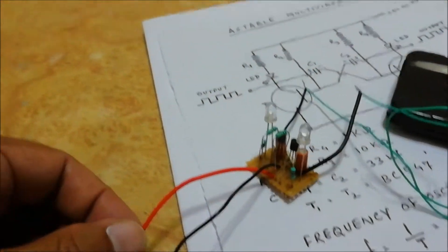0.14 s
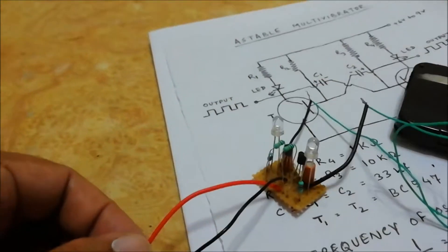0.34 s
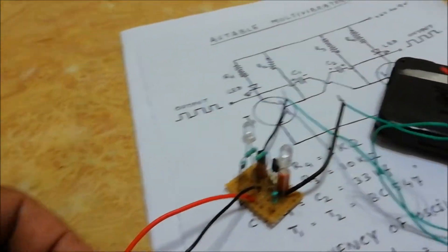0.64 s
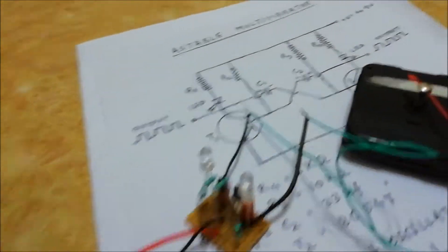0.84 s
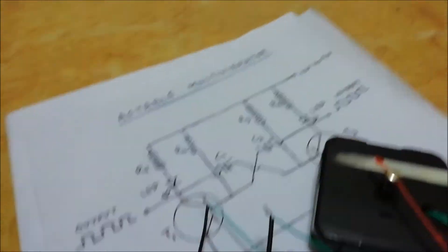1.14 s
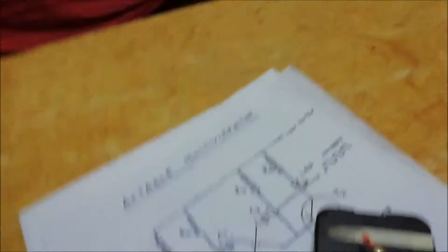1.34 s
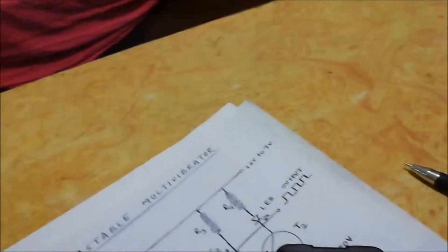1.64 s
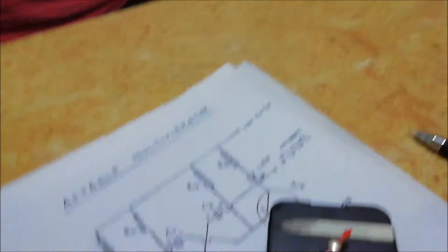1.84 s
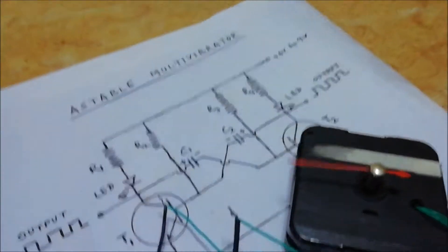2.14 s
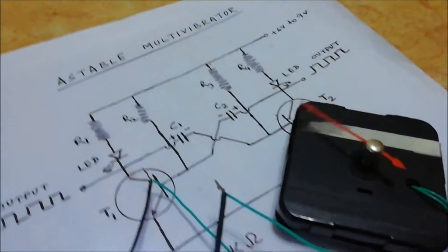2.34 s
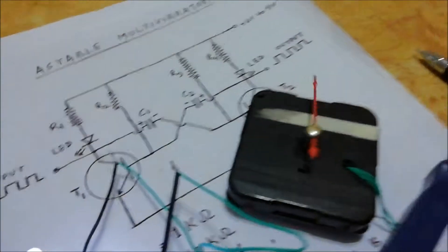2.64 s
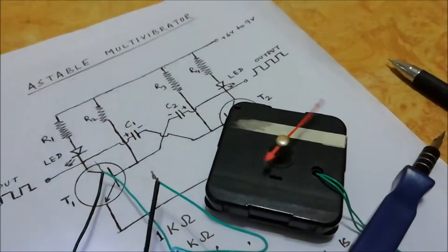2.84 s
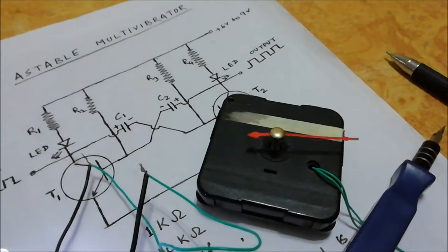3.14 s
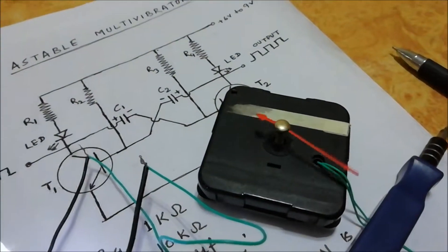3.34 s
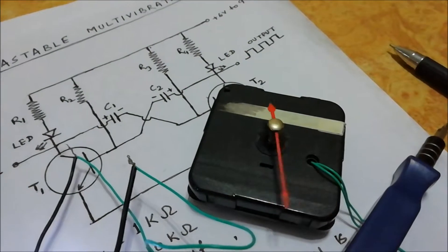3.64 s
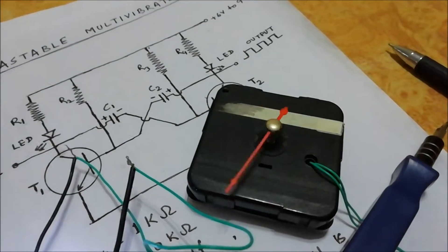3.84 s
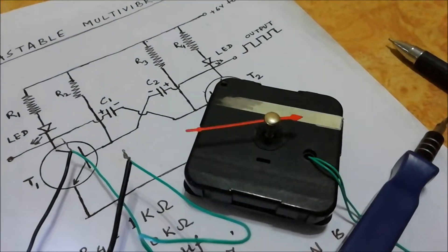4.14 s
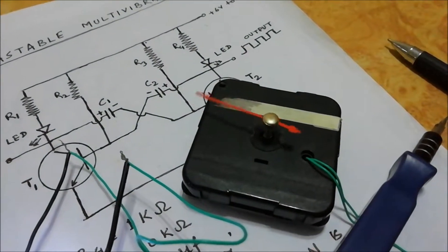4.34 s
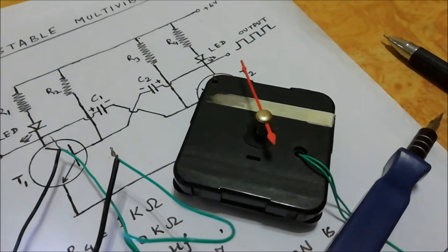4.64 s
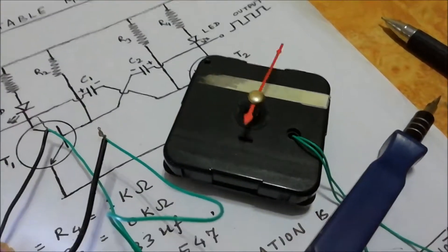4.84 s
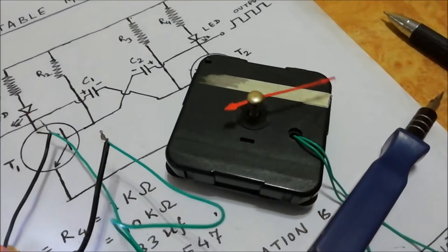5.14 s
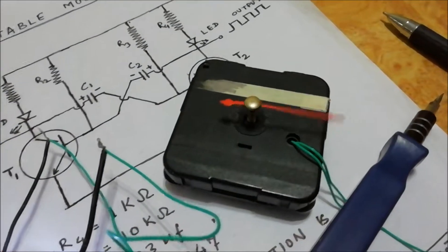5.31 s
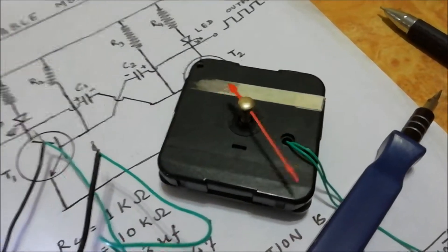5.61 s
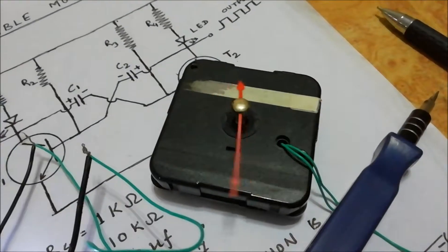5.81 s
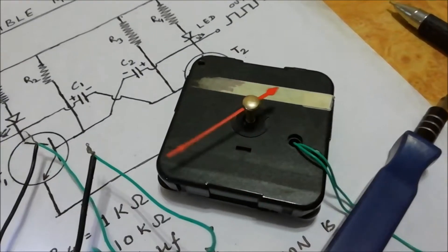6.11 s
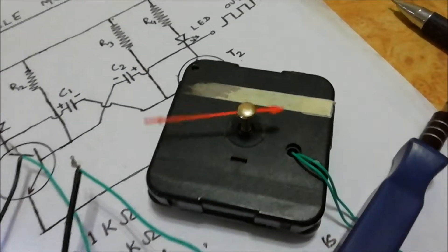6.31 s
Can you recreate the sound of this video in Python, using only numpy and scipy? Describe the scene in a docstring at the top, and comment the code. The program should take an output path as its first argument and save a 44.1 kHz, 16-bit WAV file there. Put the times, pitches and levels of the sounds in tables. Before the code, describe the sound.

Quiet indoor hum and low hiss run throughout. At about 0.2 s a short hollow scuff sounds across the room, mostly echo, dying within half a second. Low grip rumble comes and goes, with a soft bump near 0.9 s. From 1.3 to 1.6 s a tiny clock movement emerges as the phone moves closer: dull plastic gear chatter, about ten pulses per second, over a resonant desk drone. It speeds up over the next second to roughly fourteen pulses per second and becomes brighter, with crisp ticks and irregular sharp knocks, notably at 2.5 and 2.8 s. Deep handling thumps cluster at 2.3-2.7 s, the strongest near 2.66 s. Afterwards the rattling whir continues close and dry, its rate drifting slightly, its brightness varying. Softer low bumps fall near 4.2, 4.9, 5.2 and 6.45 s. The motor is still running when it ends around 6.5 s.

```python
"""Steady room hum and hiss, filtered noise, open the scene; a brief echoing scuff follows, noise in decaying bands.
Fingers bump a hand-held phone with two unlike ports: pressure pulses over a low rumble that lasts throughout.
As the phone moves closer, a desk drones (resonant noise) under a small clock movement driven far too fast.
Its rotor spins up and then hunts about a steady rate; plastic gears rattle once a turn, as impulses ringing
the decaying modes of desk top and plastic case."""
import sys
import numpy as np
from scipy import signal
from scipy.fft import rfft, irfft, next_fast_len
from scipy.io import wavfile
from scipy.ndimage import uniform_filter1d

SR = 44100
rng = np.random.default_rng(int(sys.argv[2]) if len(sys.argv) > 2 else 0)


def int16_out(signal):
    """Quantize to a 16-bit WAV file."""
    q = np.round(np.clip(np.atleast_2d(signal).T, -1, 1) * 32767)
    wavfile.write(sys.argv[1], SR, q.astype(np.int16))


def voltage_ratio(level):
    """Linear amplitude factor for a level in decibels (scalar or array-like)."""
    return 10 ** (np.asarray(level, float) / 20)


N = 285395
T = np.arange(N) / SR

# basic gear chatter in the low modes as the phone moves: (time [s], level [dB])
CHATTER_LOW = [(1.3, -102), (1.46, -79), (1.535, -68), (1.62, -62.5), (2.1, -62), (3.0, -63.5),
               (3.15, -69.5), (3.4, -68), (5.8, -65.5), (6.15, -69.5), (6.47, -63.5)]
# top modes of the chatter against the low ones: (time [s], level [dB])
CHATTER_TOP = [(1.55, -19), (2.4, -11), (3.0, -10), (3.25, -12), (3.5, -7), (3.95, -11.5), (4.75, -6.5),
               (5.15, -11), (5.5, -7), (6.47, -10)]
# hardest slaps of teeth through their backlash: (time [s], top-mode level [dB], low-mode level [dB])
KNOCKS = [(1.585, -53, -50), (1.594, -55, -44), (1.668, -55.5, -47), (1.688, -47.5, -46.5),
          (1.777, -65, -43.5), (1.868, -51.5, -51.5), (1.884, -53.5, -50.5), (1.954, -41.5, -47),
          (1.977, -51, -50), (2.052, -55, -44.5), (2.061, -53.5, -42.5), (2.069, -52, -46),
          (2.147, -53.5, -51), (2.157, -55, -51.5), (2.223, -53.5, -52.5), (2.237, -46.5, -48),
          (2.287, -48.5, -57), (2.396, -47, -45), (2.465, -44, -47), (2.505, -36, -45), (2.568, -46, -47.5),
          (2.732, -41.5, -51.5), (2.756, -47, -52), (2.827, -40, -48), (2.834, -29.5, -39.5),
          (2.896, -43.5, -43), (2.969, -43, -45.5), (2.975, -35.5, -47), (3.038, -48, -64),
          (3.112, -46, -51), (3.387, -48, -53), (3.459, -46.5, -62), (3.529, -43, -51), (3.641, -46, -57),
          (3.811, -47, -51), (3.876, -45, -54), (4.09, -45.5, -55), (4.149, -43.5, -53),
          (4.239, -51.5, -50.5), (4.346, -51, -50), (4.413, -46, -54), (4.515, -48, -55),
          (4.657, -39.5, -55), (4.701, -42.5, -55), (4.731, -46, -52), (4.874, -42.5, -58),
          (5.016, -47.5, -52), (5.309, -49, -69), (5.318, -46, -66), (5.377, -44.5, -62), (5.532, -46, -53),
          (5.634, -45, -55), (5.732, -44.5, -55), (5.881, -38.5, -45), (5.995, -49, -53.5),
          (6.022, -48.5, -55), (6.422, -53, -54)]
# modes rung by the gears, at each port: the lowest two of the desk top, the rest of the plastic case:
# (frequency [Hz], t60 [ms], left level [dB], right level [dB])
RUNG_MODES = [(1250, 20, -23, -18.5), (1866, 12.4, -20.5, -13), (2256, 21.2, -14.5, -7.5),
              (2500, 16.7, -10, -8.5), (2824, 8.8, -5, -12), (3290, 4.8, -3, -18), (4240, 7.1, -62, -8),
              (4980, 5, -1.5, -22), (5740, 6.1, -9.5, -10), (6360, 8.6, -6, -29), (6970, 8.2, -12, -51),
              (8540, 4.74, -55, -4.5), (9380, 5, -53, -12), (11400, 2.8, -36, -31)]
# delay of the right port as the phone turns: (time [s], delay [ms])
PORT_LAG = [(1.58, 0.092), (3.0, 0.18)]
# resonances of the desk top, relative levels: (frequency [Hz], width [Hz], level [dB])
DESK_MODES = [(1152, 330, 6.5), (1847, 310, 7.5)]
# fingers bumping the phone: (time [s], peak level [dB], nominal push length [ms])
THUMPS = [(0.892, -34, 4.7), (1.513, -36, 6.6), (2.325, -28.5, 5.7), (2.503, -28, 5.1), (2.543, -27.5, 3.7),
          (2.653, -22, 3.9), (2.663, -16, 2.66), (2.681, -20, 3.6), (4.213, -25.5, 5.6),
          (4.353, -33.5, 7.5), (4.912, -38.5, 5.7), (5.24, -35, 6.73), (6.453, -36, 4.58)]
# rumble from an unsteady grip: (time [s], level [dB])
GRIP = [(0, -63.5), (.43, -51.5), (.5, -61.5), (.88, -47), (1.1, -61), (1.49, -47), (1.95, -60),
        (2.08, -48.5), (2.2, -66), (2.33, -42), (2.68, -35.5), (2.76, -56), (2.86, -45), (2.93, -65),
        (3.3, -66.5), (3.42, -50.5), (3.72, -67), (4.17, -42.5), (4.36, -43.5), (4.55, -64), (4.84, -70),
        (4.91, -45.5), (5.05, -64.5), (5.27, -49.5), (5.8, -64), (6.47, -48)]
# bands of the scuff, relative levels: (frequency [Hz], width [Hz], level [dB])
SCUFF_BANDS = [(677, 190, 7), (880, 110, 14.5), (1410, 800, 1), (6200, 2500, -13.5)]
# spectrum shape of the room sound common to both ports: (frequency [Hz], relative density [dB per Hz])
ROOM_MID = [(140, -9.5), (216, 1), (391, -9), (476, -18.5), (750, -15), (932, -24.5), (1090, -18),
            (1500, -14.5), (1730, -18.5), (1890, -14.5), (2020, -25), (2200, -26.5), (3940, -35),
            (6600, -35.5), (7560, -40.5), (14800, -38.5)]
# spectrum shape of the room sound opposed in the ports: (frequency [Hz], relative density [dB per Hz])
ROOM_SIDE = [(60, -23), (145, -4.5), (661, 2), (1300, -6), (1890, -7.5), (3620, -19), (6180, -19),
             (7630, -26), (14600, -23)]
# room sound, left minus right: (frequency [Hz], level difference [dB])
PORT_BALANCE = [(400, 0), (700, -4.5), (1300, -0.5), (2200, -6), (4000, 0.5)]

# rotor: turn zero falls at FIRST_S, while the speed is still short of full
FIRST_S, FULL_TURNS_PER_S, SHORT_TURNS_PER_S, SPIN_UP_S = 1.585, 14.447, 4.81, 0.843
HUNT_TURNS, HUNT_PERIOD_S, HUNT_FROM_S = 0.38, 4.22, 3.054


def movement(mode_scatter=0.98, port_scatter=0.45):
    """Modal excitation: each contact lands elsewhere on the teeth and rings every mode differently."""
    when, db = teeth()
    lag_s = np.interp(when, *np.transpose(PORT_LAG)) / 1000
    common = rng.choice([-1, 1], len(when))
    out = np.zeros((2, N))
    for hz, t60_ms, left_db, right_db in RUNG_MODES:
        register = np.searchsorted([3700, 7500], hz)  # low, middle or top modes
        size = voltage_ratio(db[register])
        own, left, right = rng.standard_normal((3, len(when)))
        blow = common + mode_scatter * own
        unlike = port_scatter * hz / 2400  # short waves reach the two ports by different paths
        left_hits = taps(when, size * (blow + unlike * left))
        right_hits = taps(when + lag_s, size * (blow + unlike * right))
        ringing = ring(np.array([left_hits, right_hits]), hz, t60_ms / 1000)
        out += voltage_ratio([[left_db], [right_db]]) * ringing
    return out


def teeth():
    """Impact with backlash: times and (low, middle, top) levels of dense chatter and bouncing knocks."""
    when, chatter = chatter_contacts()
    at, knocks = knock_contacts()
    return np.r_[when, at], np.c_[chatter, knocks]


def chatter_contacts(count=6000, scatter_db=2.5, most_db=21.0, surge_db=2.5):
    """Random impacts at uniform times, lifted by each jerk of the rotor and bounded by the backlash."""
    start = CHATTER_LOW[0][0]
    when = start + (T[-1] - start) * rng.random(count)
    size_db = scatter_db * rng.exponential(size=count)
    shared = walk(60)
    chatter = []
    # the jerks show most in the upper modes
    for base_db, share in zip(gears_db(when), [0.65, 1.05, 1.2]):
        surge = np.interp(when, T, surge_db * (shared + walk(40)))
        lift_db = size_db + share * beat(when) + surge
        chatter.append(base_db + most_db * np.tanh(lift_db / most_db))
    return when, np.array(chatter)


def knock_contacts(bounces=12, middle_db=-4.5):
    """Repeated impact: each knock or tick is a cluster of bounces that fade soonest in the treble."""
    at, top_db, low_db = np.repeat(np.r_[KNOCKS, ticks()], bounces, axis=0).T
    dull_db = np.clip(low_db - top_db, 0, 25)
    drag = 1 + 0.1 * dull_db  # dull knocks swell in and drag on, bright ones start sharply
    after_ms = 4.5 * drag * rng.random(len(at)) - 0.3 * dull_db
    fade_db = -np.outer([0.8, 2.1, 2.6], np.abs(after_ms) / drag)
    start_db = np.array([low_db, (low_db + top_db) / 2 + middle_db, top_db])
    return at + (after_ms - 1.2) / 1000, start_db + fade_db


def ticks(count=6, first=0.42, apart=0.135, slip=0.035,
          low_over_db=3.0, top_over_db=12.0, spread_db=4.0, share=0.46):
    """Periodic tooth contact: trains of crisp ticks of chance strength, with a rest after each main jerk."""
    # first, apart and slip are in turns
    whole_turns = np.arange(int(turns(T[-1])))[:, None]
    turn = (whole_turns + first + apart * np.arange(count)).ravel()
    off, top, low = rng.standard_normal((len(turn), 3)).T
    at = np.interp(turn + slip * off, turns(T), T)
    low_db, _, top_db = gears_db(at) + share * beat(at)
    top_db = top_db + top_over_db + spread_db * top
    low_db = low_db + low_over_db + spread_db * low / 2
    free = np.abs(at[:, None] - np.array(KNOCKS)[:, 0]).min(axis=1) > 0.006  # clear of the knocks
    return np.c_[at, top_db, low_db][free]


def gears_db(s, middle_db=-9, middle_db_per_turn_s=0.5):
    """Speed-dependent excitation: basic chatter in three registers, the middle stronger below full speed."""
    low = np.interp(s, *np.transpose(CHATTER_LOW))
    middle = low + middle_db + middle_db_per_turn_s * shortfall(s)
    top = low + np.interp(s, *np.transpose(CHATTER_TOP))
    return np.array([low, middle, top])


def beat(s, main_db=11, second_db=4.0, second_at=0.66, width=0.22, quick=0.56):
    """Cyclic modulation: the rotor winds up to a hard jerk once a turn, then jerks less hard later in it."""
    def jerk(at):
        u = (turns(s) - at + 0.5) % 1 - 0.5  # turns from the jerk
        return np.exp(-0.5 * (u / width / np.where(u > 0, quick, 1)) ** 2)  # quicker to fall quiet
    return main_db * jerk(0.063) + second_db * jerk(second_at)


def turns(s):
    """Integrated speed: rotor turns since FIRST_S, with an exponential spin-up and a slow sinusoidal hunt."""
    def hunt(t):
        return HUNT_TURNS * np.sin(2 * np.pi * (t - HUNT_FROM_S) / HUNT_PERIOD_S)
    lost = SPIN_UP_S * (SHORT_TURNS_PER_S - shortfall(s))
    return FULL_TURNS_PER_S * (s - FIRST_S) - lost + hunt(s) - hunt(FIRST_S)


def shortfall(s):
    """Exponential approach: turns a second still missing from full speed, hunting aside."""
    return SHORT_TURNS_PER_S * np.exp(-(s - FIRST_S) / SPIN_UP_S)


def desk(db=-64.5, start_s=1.17, rise_s=0.22, share=0.4, slow_db=9.5):
    """Forced resonance: the desk top drones, its lowest mode strongest while the rotor is still slow."""
    slowness = np.clip(shortfall(T) / SHORT_TURNS_PER_S, 0, 1.3)
    noise = rng.standard_normal(N)
    lowest = bands(noise, DESK_MODES[:1]) * voltage_ratio(slow_db * slowness)
    drone = lowest + bands(noise, DESK_MODES[1:])
    rise = 1 - np.exp(-np.clip(T - start_s, 0, None) / rise_s)
    return level(drone, db) * rise ** 2 * voltage_ratio(share * beat(T) + walk(30))  # db holds before this shaping


def handling():
    """Structure-borne sound: short pushes on the phone case over a low grip rumble."""
    return thumps() + grip_rumble()


def thumps(rebound=2.3, lead=0.15, lag_ms=0.85):
    """Push and rebound: a narrow pulse less a broad one, so a dip frames each push, deeper before it."""
    out = np.zeros((2, N))
    for s, db, push_ms in THUMPS:
        near = slice(int((s - 0.06) * SR), int((s + 0.06) * SR))
        from_push_s = T[near] - s - np.array([[0], [lag_ms / 1000]])  # later at the right port
        u = from_push_s * 1000 * np.sqrt(8 * np.log(2)) / push_ms  # full width at half height to sigma
        u = u * np.where(u < 0, 1.3, 0.8)  # quick to load, slower to release
        push = rebound * np.exp(-u ** 2 / 2)
        dip = np.exp(-((u + lead) / rebound) ** 2 / 2)
        out[:, near] += voltage_ratio(db) * (push - dip) / (rebound - 1)
    return out


def grip_rumble(unlike=0.17):
    """Low-frequency friction noise: an unsteady grip gives a rumble nearly alike in both ports."""
    shape = [(10, -20.5), (28, 0.5), (55, 0.5), (110, -10.0), (220, -19.5), (500, -65.0)]  # (Hz, dB)
    mid, side = colour(rng.standard_normal((2, N)), shape)
    rumble = (mid + unlike * side * np.array([[1], [-1]])) * voltage_ratio(1.3 * walk(20))
    return level(rumble, 0) * voltage_ratio(np.interp(T, *np.transpose(GRIP)))


def scuff(start=0.1705, rise=0.013, t60=0.48, db=-68):
    """Reverberant decay: a short hollow scuff across the room, mostly echo, whose treble dies first."""
    u = np.clip(T - start, 0, None)
    noise = rng.standard_normal((2, N))
    echo = 0
    for band in SCUFF_BANDS:
        fade_db = -60 * u / t60 * (band[0] / 900) ** 0.4  # t60 [s] holds at 900 Hz
        echo = echo + bands(noise, [band]) * voltage_ratio(fade_db)
    onset = (1 - np.exp(-u / rise)) ** 2
    return level(echo * onset * voltage_ratio(1.5 * walk(54.0)), db)  # rms over the whole scene


def room(mid_db=-55.5, side_db=-62):
    """Partial coherence: steady hum and hiss, alike in both ports only at some pitches."""
    # rms levels before the slow wander
    mid = level(colour(rng.standard_normal(N), ROOM_MID), mid_db) * voltage_ratio(1.07 * walk(11))
    side = level(colour(rng.standard_normal(N), ROOM_SIDE), side_db) * voltage_ratio(2.1 * walk(16))
    # each port takes half of the balance, with opposite sign
    return np.array([colour(mid + k * side, np.array(PORT_BALANCE) * [1, k / 2]) for k in (1, -1)])


def ring(x, hz, t60, rise=0.0018):
    """Damped resonance: a decaying mode fed through a quicker one, to swell in as soft plastic does."""
    w = 2 * np.pi * hz / SR
    slow, quick = np.exp(-np.log(1000) / (np.array([t60, rise]) * SR))
    x = signal.lfilter([2 * (1 - quick) * np.sin(w)], [1, -2 * quick * np.cos(w), quick ** 2], x)
    return signal.lfilter([np.sin(w)], [1, -2 * slow * np.cos(w), slow ** 2], x)


def taps(s, size):
    """Impulse excitation at times s, each impulse shared between two samples."""
    at = np.clip(s * SR, 0, N)
    i = at.astype(int)
    early = np.bincount(i, size * (1 - at + i), N + 2)
    late = np.bincount(i + 1, size * (at - i), N + 2)
    return (early + late)[:N]


def bands(x, peaks):
    """Superposition of steep resonances, each applied twice."""
    out = 0
    for hz, width, db in peaks:
        peak = signal.iirpeak(hz, hz / width, SR)
        once = signal.lfilter(*peak, x)
        out = out + voltage_ratio(db) * signal.lfilter(*peak, once)
    return out


def colour(x, points):
    """Spectral shaping through (Hz, dB) points, joined along log frequency."""
    hz, db = np.transpose(points)
    size = next_fast_len(N)
    f = np.maximum(np.arange(size // 2 + 1) * SR / size, 1)
    gain = voltage_ratio(np.interp(np.log(f), np.log(hz), db))
    return irfft(rfft(x, size) * gain, size)[..., :N]


def walk(rate):
    """Low-pass randomness: held noise at rate [Hz], smoothed twice to a slow wander of unit rms."""
    k = int(SR / rate)
    held = np.repeat(rng.standard_normal(N // k + 1), k)
    return level(uniform_filter1d(uniform_filter1d(held, k), k)[:N], 0)


def level(x, db):
    """Energy normalisation: scale to an rms level."""
    return x * voltage_ratio(db) / np.sqrt(np.mean(x ** 2))


def scene():
    """Linear superposition of all sources at the two ports."""
    return movement() + desk() + handling() + scuff() + room()


def band_limit(x):
    """A steep low-pass at the top of the band."""
    return signal.sosfilt(signal.butter(12, 15980, fs=SR, output="sos"), x)


def record(dry):
    """Low-pass filtering: the phone cuts the treble steeply above 15.7 kHz."""
    top_cut = signal.ellip(8, 0.2, 60, 15700, fs=SR, output="sos")
    mix = signal.sosfilt(top_cut, dry)
    return band_limit(mix)


dry = scene()
out = record(dry)
int16_out(out)
```